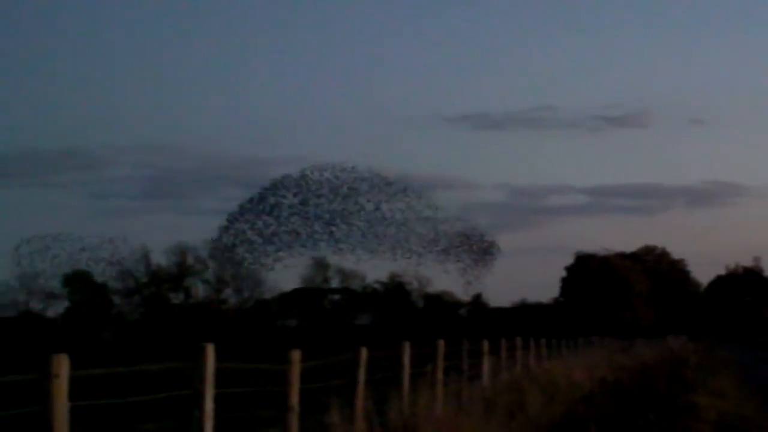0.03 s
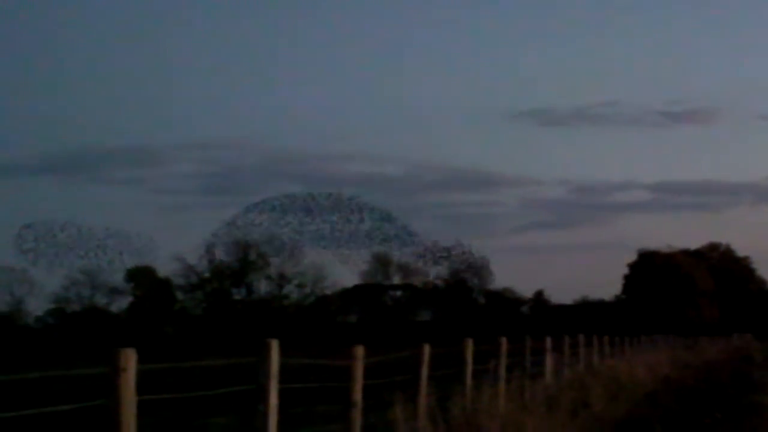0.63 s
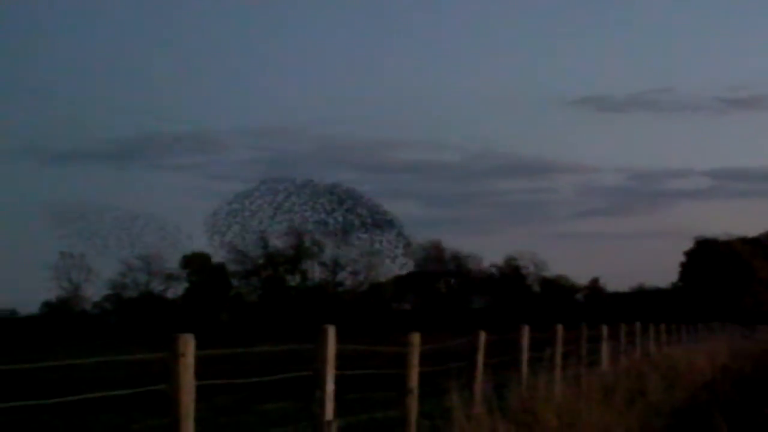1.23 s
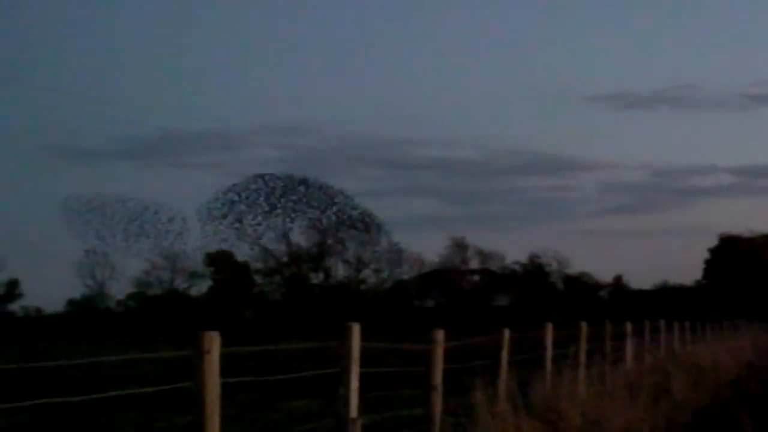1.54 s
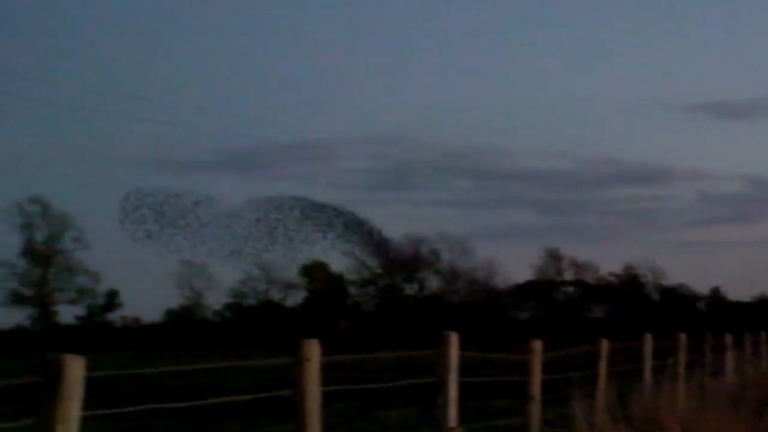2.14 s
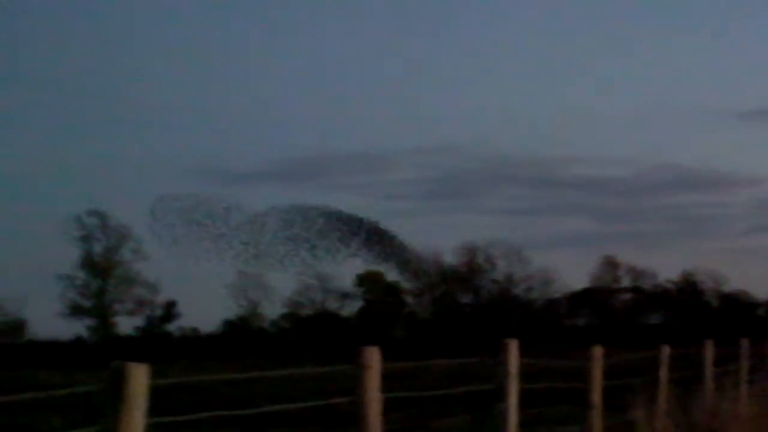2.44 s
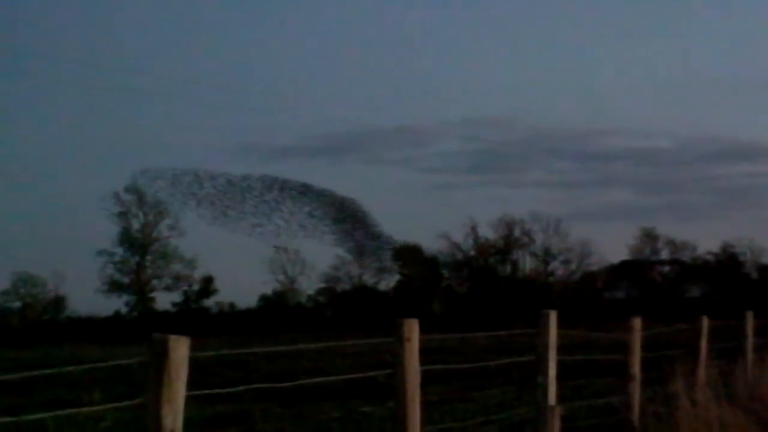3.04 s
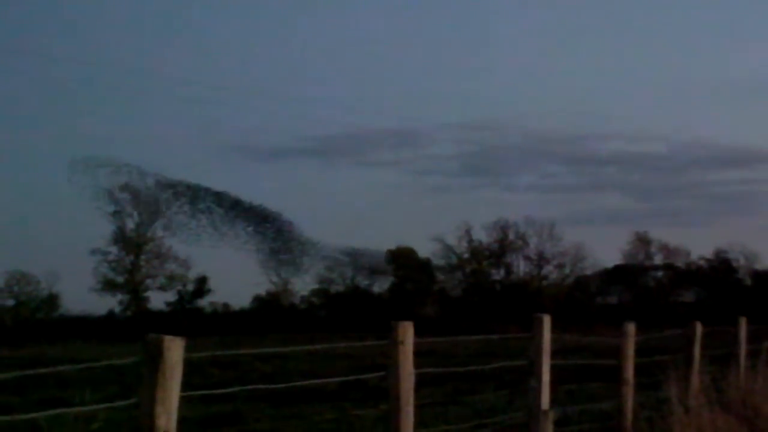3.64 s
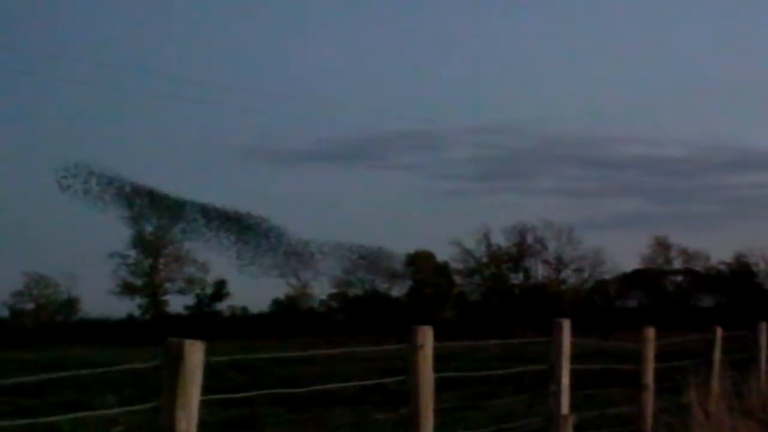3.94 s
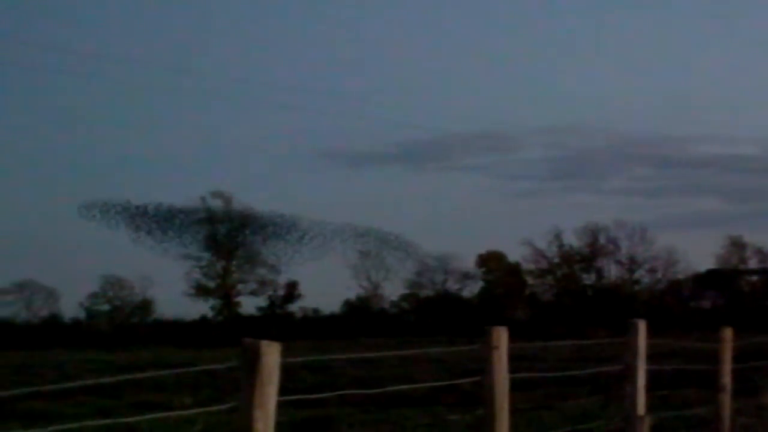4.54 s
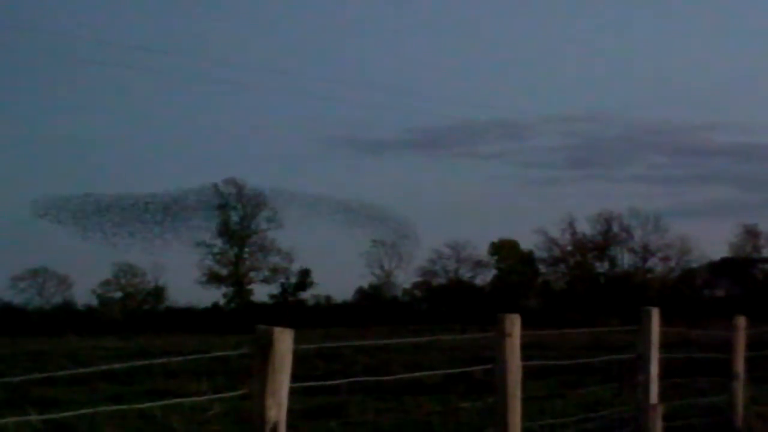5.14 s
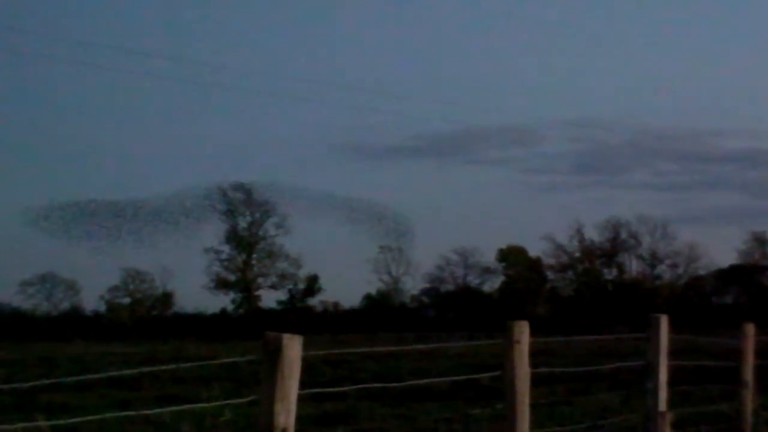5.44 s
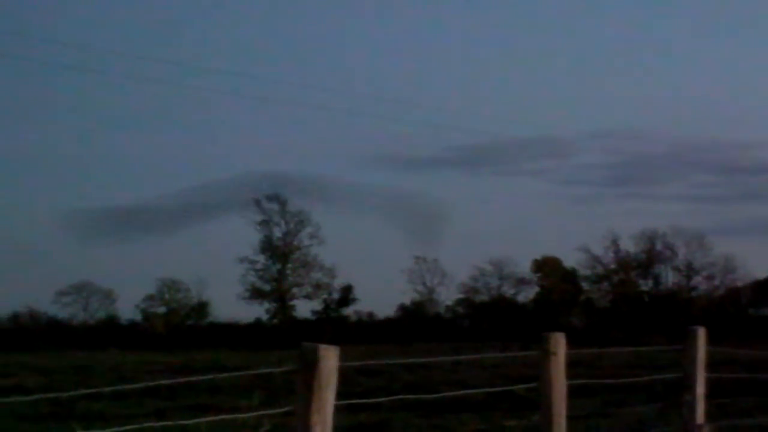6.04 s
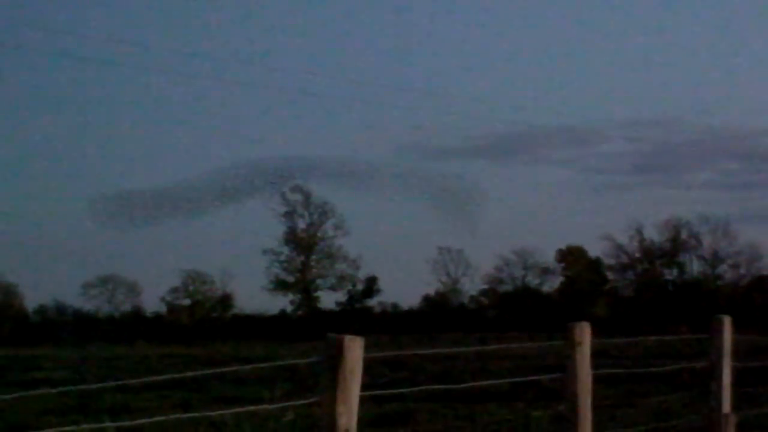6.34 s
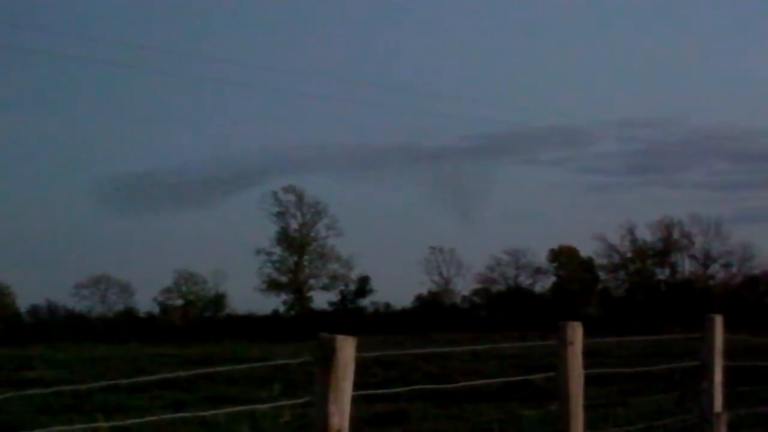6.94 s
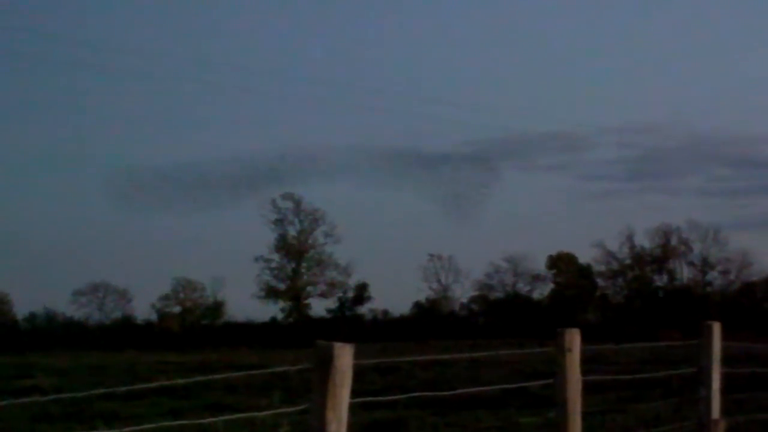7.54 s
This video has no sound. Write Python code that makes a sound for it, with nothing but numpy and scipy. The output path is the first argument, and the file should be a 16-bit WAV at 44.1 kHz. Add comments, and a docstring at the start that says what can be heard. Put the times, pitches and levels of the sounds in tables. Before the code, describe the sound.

A big flock of starlings chatters over an open field, the distant calls and wingbeats merging into a steady high hiss. Thin whistles, slurred screeches, short chips and harsh rasps poke out throughout. Midway, one bird close to the microphone gives a louder rapid rattle, a brief lower warble and a second, shorter rattle. The flock carries on unchanged over a faint low rumble.

```python
"""A field at dusk. A big starling flock chatters; countless far voices and wings merge into a hiss.
Slurred screeches, whistles, chips and harsh rasps stand out. One near bird gives two runs of a rapid
rattle with a short low warble between. Tonal calls are trembling near-sines from the syrinx; rasps,
wings, a faint rumble and one dull bump are shaped noise. Two microphones sit close together."""
import sys
import numpy as np
from scipy import signal
from scipy.fft import rfft, irfft, next_fast_len
from scipy.io import wavfile

SR = 44100
rng = np.random.default_rng(int(sys.argv[2]) if len(sys.argv) > 2 else 0)


def to_wav(sig):
    """Store sig (one row per channel, or 1-D mono) as 16-bit WAV at the path in sys.argv[1].

    Samples outside -1..1 are clipped; the rate is SR.
    """
    pcm = np.clip(np.atleast_2d(sig), -1, 1) * 32767
    pcm = np.round(pcm).astype(np.int16)
    wavfile.write(sys.argv[1], SR, pcm.T)  # frames by channels


N = 343539

# Flock swell. Each row: time in seconds, then relative chatter, hiss and sizzle levels in dB.
FLOCK_LEVELS = [(0.0, -47, -43, -54), (0.32, -46, -48.5, -58.5), (0.74, -45.5, -45.5, -53),
                (1.32, -45.5, -47, -56.5), (1.69, -45, -44.5, -55), (1.99, -45.5, -49, -58),
                (2.56, -46, -43.5, -52), (3.17, -45, -47.5, -57), (3.64, -45.5, -44.5, -54),
                (3.99, -44, -46, -54.5), (4.34, -44.5, -46.5, -56.5), (4.79, -42, -44.5, -52),
                (5.01, -45.5, -48, -56), (5.57, -45.5, -48, -55.5), (6.16, -45, -46.5, -56),
                (6.33, -44.5, -45, -53), (7.03, -44, -43.5, -51), (7.79, -47, -49, -57)]
# Background swell. Each row: time in seconds, rumble level in dB, wing level in dB.
BACKGROUND_LEVELS = [(0, -58, -50), (1.0, -59, -51), (1.4, -55, -50), (1.8, -60, -49.5), (2.8, -57, -49.5),
                     (3.7, -59.5, -50), (4.5, -59, -50.5), (6.5, -61, -51), (7.8, -63, -51.5)]
# Source spectra. Each row: frequency in Hz, relative spectral density in dB.
CHATTER_SPECTRUM = [(700, -29), (1200, -5.5), (1700, -3.5), (2700, 0), (3400, 0), (4100, -0.5),
                    (5000, -0.5), (7000, -49)]
HISS_SPECTRUM = [(3500, -21), (4600, -7), (5300, 2), (6000, -0.5), (6700, -0.5), (7500, 3), (8300, -4),
                 (8800, -5), (9300, -11.5), (11000, -53)]
SIZZLE_SPECTRUM = [(7500, -4), (9300, -0.5), (10200, 2), (11000, -6), (12000, 0), (13000, -7.5),
                   (14000, -5), (15200, -12.5), (16000, -20)]
RUMBLE_SPECTRUM = [(20, -20), (40, -9.5), (60, -1), (85, 1), (150, 0.5), (200, -7.5), (270, -14),
                   (400, -43)]
WING_SPECTRUM = [(200, -11.5), (280, -14), (320, -7.5), (380, -0.5), (430, 1), (500, -3), (800, -2),
                 (1200, -2), (1800, -4.5), (3500, -12.5)]
RASP_SPECTRUM = [(1200, -35), (2400, -4), (3200, 3), (4300, 1.5), (5600, 3), (6700, 0), (8300, -4),
                 (9400, -4.5), (10300, -7.5), (11100, -6), (12200, 1), (13500, -11.5), (15500, -25)]
BUMP_SPECTRUM = [(150, -10), (340, -4), (550, 0), (800, -9), (1300, -29)]
# Screeches. Each row: start in seconds, length in seconds, middle pitch in Hz, relative level in dB.
SCREECH_CALLS = [(-0.06, 0.28, 5590, -39.5), (0.572, 0.085, 6800, -35), (.62, 0.14, 5550, -38.5),
                 (0.82, .15, 5570, -40), (1.782, 0.12, 6250, -42), (2.071, 0.2, 7770, -40),
                 (2.382, 0.15, 5450, -41.5), (2.548, 0.16, 5900, -39.5), (2.659, .15, 5560, -41),
                 (3.368, 0.13, 6800, -34), (4.492, .13, 5780, -36.5), (5.013, .057, 5680, -40),
                 (5.296, 0.16, 5170, -43), (6.321, 0.19, 5470, -42)]
# Toneless calls. Each row: start in seconds, length in seconds, level in dB.
RASP_CALLS = [(0.096, 0.077, -45), (0.848, 0.066, -48), (2.38, 0.16, -44.5), (4.588, 0.064, -41.5),
              (5.196, 0.058, -40), (5.445, 0.072, -43.5), (5.691, 0.043, -42), (5.749, 0.066, -37.5),
              (6.71, 0.032, -44), (6.92, 0.044, -46), (7.07, .045, -43), (7.125, .03, -43),
              (7.164, 0.026, -39), (7.565, 0.06, -34)]
# Whistles. Each row: start and length in seconds, start pitch, end pitch and pitch scatter in Hz,
# relative level in dB.
WHISTLE_CALLS = [(0.107, .17, 8300, 8050, 45, -45), (0.147, 0.05, 1400, 1390, 60, -45.5),
                 (.42, 0.22, 8200, 7600, 160, -38.5), (0.717, .067, 8400, 8200, 90, -42),
                 (1.037, 0.15, 8400, 7450, 90, -41), (1.136, 0.039, 7280, 7350, 200, -31),
                 (1.293, 0.18, 7350, 7150, 169, -36.5), (1.602, .049, 8750, 8450, 110, -38),
                 (1.603, .12, 7800, 8400, 140, -36), (1.836, 0.086, 7600, 7950, 50, -40),
                 (2.196, 0.046, 7860, 8600, 120, -36), (2.264, .053, 7900, 7820, 40, -42),
                 (3.019, 0.099, 8900, 8400, 140, -45), (4.059, .032, 7820, 7500, 100, -31),
                 (4.353, 0.13, 8200, 7600, 180, -42), (4.815, .17, 7480, 7790, 150, -34),
                 (5.174, .047, 7630, 7500, 40, -38.5), (6.118, .41, 7270, 7360, 111, -39.5),
                 (6.579, 0.14, 6040, 7300, 35, -36), (6.745, 0.044, 7300, 7320, 150, -32),
                 (7.008, .166, 7400, 6870, 110, -37), (7.263, 0.066, 8450, 8280, 40, -41.5),
                 (7.46, .064, 6350, 7000, 35, -35)]
# Chips. Each row: start in seconds, length in seconds, middle pitch in Hz, relative level in dB.
CHIP_CALLS = [(0.234, .055, 2750, -44), (3.272, .025, 2900, -43), (4.341, 0.0235, 2600, -40),
              (4.444, 0.023, 2540, -38), (4.599, 0.018, 3050, -37), (6.782, 0.025, 3440, -44),
              (6.849, .044, 4615, -34), (7.567, 0.035, 4800, -37.5)]
# Rattle. Each row: time of the top note in seconds, pitch factor, pip, swoop and rasp levels in dB,
# pitch scatter in Hz.
RATTLE_SYLLABLES = [(3.356, 0.99, -44, -31.5, -37.5, 150), (3.455, 1.0, -37, -27.5, -36.5, 70),
                    (3.552, 1.0, -32, -28, -37, 70), (3.651, 0.99, -30.5, -28, -37, 70),
                    (3.749, 0.99, -32.5, -29, -37.5, 70), (3.850, 0.96, -33, -29.5, -37.5, 70),
                    (3.953, 0.93, -32, -32.5, -39, 100), (4.665, 0.97, -29.5, -32, -39, 324),
                    (4.774, 0.98, -32, -36.5, -39.5, 340), (4.867, 0.94, -39, -36.5, -38.5, 260),
                    (4.984, 0.76, -41, -39.5, -45, 260)]
# Pulses on the warble's held note. Each row: centre in seconds, level in dB.
HELD_NOTE_PULSES = [(4.056, -35), (4.075, -36), (4.091, -33), (4.131, -30), (4.154, -33), (4.166, -34),
                    (4.196, -33), (4.207, -33), (4.241, -33.5)]
# Dips below that note. Each row: centre in seconds, lowest pitch in Hz, relative level in dB.
HELD_NOTE_DIPS = [(4.073, 2480, -36.5), (4.109, 1890, -36), (4.149, 2370, -39), (4.187, 2370, -45),
                  (4.224, 2500, -44)]
# Microphone balance. Each row: frequency in Hz, left minus right in dB.
MIC_BALANCE_DB = [(60, 1.5), (200, 1.5), (330, 1.5), (1200, 1), (2700, 0), (4200, 2), (6400, 2), (9800, -3),
                  (15000, -1.5)]
# Left microphone phase. Each row: frequency in Hz, phase against the right in radians (negative lags).
LEFT_PHASE_RAD = [(0, -0.5), (2240, -1.0), (3360, -1.3), (4600, -2), (5700, -2.5), (6400, -2.5),
                  (8500, -4.5), (12600, -5), (15500, -5.5)]


def from_db(db):
    """Decibels to gain."""
    return 10 ** (np.asarray(db) / 20)


def unit_rms(x):
    """Scale to rms 1."""
    return x / np.sqrt(np.mean(x ** 2) + 1e-20)


def curves(rows):
    """Each level column, interpolated to every sample."""
    times_s, *columns = np.transpose(rows)
    return [np.interp(np.arange(N) / SR, times_s, column) for column in columns]


def at_hz(points, hz):
    """Read a spectrum on a log-frequency axis."""
    points_hz, values = np.transpose(points)
    return np.interp(np.log(hz + 1), np.log(points_hz), values)


def drift(rate_hz, size):
    """Random wander, spread 1, with rate_hz knots a second."""
    steps = np.arange(size) * rate_hz / SR
    knots = rng.standard_normal(int(steps[-1]) + 3)
    return np.interp(steps + rng.random(), np.arange(len(knots)), knots) * np.sqrt(3 / 2)


def noise(spectrum, apart=0.23):
    """Shaped stereo noise, rms 1; apart weights the part that differs between microphones."""
    size = next_fast_len(N)
    hz = np.fft.rfftfreq(size, 1 / SR)
    octaves_outside = np.abs(np.log2((hz + 1) / np.clip(hz, spectrum[0][0], spectrum[-1][0])))
    gain = from_db(at_hz(spectrum, hz) - 20 * octaves_outside)
    white = rng.standard_normal((3, size))
    pair = white[0] + apart * white[1:]
    return unit_rms(irfft(rfft(pair) * gain, size)[:, :N])


def add(out, start_s, sound):
    """Mix a sound in at start_s."""
    i = round(start_s * SR)
    lo, hi = max(i, 0), min(i + len(sound), N)
    if hi > lo:
        out[lo:hi] += sound[lo - i:hi - i]


def arch(length_s):
    """Swell and fade, height 1."""
    return np.sqrt(np.sin(np.linspace(0, np.pi, max(int(length_s * SR), 20))).clip(0))


def syrinx(hz, scatter_hz, flutter_db, overtone_db=-26, buzz=0., buzz_hz=1350):
    """Near-sine trembling in pitch and level; fast membrane buzz adds sidebands."""
    size = len(hz)
    phase = 2 * np.pi * np.cumsum(hz + scatter_hz * drift(1100, size)) / SR
    flutter = unit_rms(from_db(flutter_db * drift(260, size)))
    buzz_phase = 2 * np.pi * np.cumsum(buzz_hz * (1 + 0.113 * drift(330, size))) / SR
    throb = 1 + buzz * np.sin(buzz_phase)
    overtones = sum((k * hz < SR / 2) * np.sin(k * phase) / (k - 1) for k in (2, 3))
    return np.sqrt(2) * flutter * throb * (np.sin(phase) + from_db(overtone_db) * overtones)


def slur(length_s, start_hz, middle_hz, end_hz, scatter_hz):
    """One call bending through three pitches."""
    swell = arch(length_s)
    bend = np.polyfit([0, .5, 1], [start_hz, middle_hz, end_hz], 2)
    hz = np.polyval(bend, np.linspace(0, 1, len(swell)))
    return swell * syrinx(hz, scatter_hz, flutter_db=3)


def crowd(spectrum, low_hz, high_hz, length_s, scatter_hz, spread_db, count):
    """Far birds calling at random, mostly in falling slurs; rms 1."""
    out = np.zeros(N)
    for when, pitch, span, fall, harsh, distance in rng.random((count, 6)):
        hz = low_hz + pitch * (high_hz - low_hz)
        slide = 0.1012 * (fall - .3)
        start_hz, end_hz = hz * (1 + slide), hz * (1 - slide / 2)
        call = slur(length_s * (.4 + span), start_hz, hz, end_hz, scatter_hz * (0.2 + harsh))
        gain = from_db(at_hz(spectrum, hz) - spread_db * np.sqrt(distance))
        add(out, when * N / SR - length_s / 2, gain * call)
    return unit_rms(out)


def far_flock():
    """Low chatter, high squeals, a few pure whistles; the farthest voices blur into hiss."""
    chirps = crowd(CHATTER_SPECTRUM, 1397.3, 4400, length_s=.025, scatter_hz=153, spread_db=6.5, count=700)
    squeals = crowd(HISS_SPECTRUM, 4700, 9000, length_s=.06, scatter_hz=120, spread_db=5.5, count=620)
    pure = crowd(HISS_SPECTRUM, 7000, 8900, length_s=.07, scatter_hz=35, spread_db=6, count=24)
    squeaks = crowd(SIZZLE_SPECTRUM, 9300, 14000, length_s=.03, scatter_hz=220, spread_db=18, count=700)
    chatter = from_db(0.7) * noise(CHATTER_SPECTRUM, apart=0.55) + from_db(-5.5) * chirps
    hiss = from_db(3.5) * noise(HISS_SPECTRUM, apart=0.99) + from_db(1.8) * squeals + from_db(-3) * pure
    sizzle = from_db(2) * noise(SIZZLE_SPECTRUM, apart=0.76) + from_db(-4.5) * squeaks
    flicker = from_db(1.05 * drift(45, N) + 0.77 * drift(9, N))
    chatter_gain, hiss_gain, sizzle_gain = from_db(curves(FLOCK_LEVELS))
    return chatter_gain * chatter + flicker * (hiss_gain * hiss + sizzle_gain * sizzle)


def rumble_and_wings():
    """Distant rumble and the rush of wings, both wavering slightly."""
    rumble_db, wings_db = curves(BACKGROUND_LEVELS)
    rumble = from_db(rumble_db + 1.1 * drift(9, N)) * noise(RUMBLE_SPECTRUM, apart=0.5)
    wings = from_db(wings_db + .5 * drift(18, N)) * noise(WING_SPECTRUM, apart=0.28)
    return rumble + wings


def screeches(fall_hz_per_s=9500, sag_hz=197.8, scatter_hz=209):
    """Harsh calls that slide down and flatten out."""
    out = np.zeros(N)
    for start_s, length_s, hz, db in SCREECH_CALLS:
        half_fall_hz = fall_hz_per_s * length_s / 2
        call = slur(length_s, hz + sag_hz + half_fall_hz, hz, hz + sag_hz - half_fall_hz, scatter_hz)
        add(out, start_s, from_db(db) * call)
    return out


def rasps(lead_s=0.026, syllable_s=0.075, grain_db=2.5):
    """Harsh grainy noise, alone and in every rattle syllable."""
    envelope = np.zeros(N)
    for start_s, length_s, db in RASP_CALLS:
        add(envelope, start_s, from_db(db) * arch(length_s))
    for top_s, _, _, _, rasp_db, _ in RATTLE_SYLLABLES:
        add(envelope, top_s - lead_s, from_db(rasp_db) * arch(syllable_s))
    grain = unit_rms(from_db(grain_db * drift(600, N)))
    return envelope * grain * noise(RASP_SPECTRUM, apart=0.99)


def whistles(rise_share=.018):
    """Thin calls, each a shallow arch between two pitches."""
    out = np.zeros(N)
    for start_s, length_s, start_hz, end_hz, scatter_hz, db in WHISTLE_CALLS:
        middle_hz = (1 + rise_share) * (start_hz + end_hz) / 2
        add(out, start_s, from_db(db) * slur(length_s, start_hz, middle_hz, end_hz, scatter_hz))
    return out


def chips(fall_share_per_s=5.9, scatter_share=0.036):
    """Short rough calls that drop in pitch."""
    out = np.zeros(N)
    for start_s, length_s, hz, db in CHIP_CALLS:
        half_fall_hz = fall_share_per_s * hz * length_s / 2
        call = slur(length_s, hz + half_fall_hz, hz, hz - half_fall_hz, scatter_share * hz)
        add(out, start_s, from_db(db) * call)
    return out


def pip(length_s, hz, droop_share=0.042):
    """Short soft-edged note, slightly flat at both ends."""
    swell = arch(length_s)
    bend = 1 - droop_share * np.linspace(-1, 1, len(swell)) ** 2
    return swell ** 2 * syrinx(hz * bend, scatter_hz=70, flutter_db=2.5)


def swoop(pitch_factor, scatter_hz, attack_s, length_s=.036, release_s=.012):
    """Tone that wavers as it sinks; the other side of the syrinx adds an undertone."""
    base_hz, sink_hz, waver_hz, waver_fade_s = 5160, 2205, 948, 0.037
    knee_hz, db_per_octave = 4360, 25   # the voice fades below the knee
    t = np.arange(-attack_s, length_s, 1 / SR)
    effort = np.minimum(1 + t / attack_s, (length_s - t) / release_s).clip(0, 1)
    period_s = .0205 * (1 + 0.063 * rng.uniform(-0.75, 1))
    waver = np.exp(-t / waver_fade_s) * np.cos(2 * np.pi * t / period_s)
    contour_hz = base_hz + waver_hz * waver - sink_hz * (t / length_s) ** 3
    throat_db = db_per_octave * np.log2(np.minimum(contour_hz / knee_hz, 1))
    hz = pitch_factor * contour_hz
    tone = syrinx(hz, scatter_hz, flutter_db=1.8, overtone_db=-16, buzz=0.4 * effort)
    undertone = syrinx(.69 * hz, scatter_hz, flutter_db=3)
    return from_db(throat_db) * effort * (tone + from_db(-18.5) * undertone)


def rattle(pip_lead_s=0.0216, attack_s=.005):
    """Near bird repeating a pip and a swoop ten times a second, never quite alike."""
    out = np.zeros(N)
    for top_s, pitch_factor, pip_db, swoop_db, _, scatter_hz in RATTLE_SYLLABLES:
        add(out, top_s - pip_lead_s, from_db(pip_db) * pip(length_s=0.02, hz=4420))
        add(out, top_s - attack_s, from_db(swoop_db) * swoop(pitch_factor, scatter_hz, attack_s))
    return out


def warble(start_s=4.041, opening_s=.014, held_s=0.202, held_hz=3117, pulse_s=.015, dip_s=.038):
    """After a higher pip, one side of the syrinx pulses on a held note; the other dips harshly below."""
    out = np.zeros(N)
    add(out, start_s, from_db(-30.5) * pip(opening_s, hz=3790))
    held = slur(held_s, held_hz, held_hz, held_hz, scatter_hz=90)
    add(out, start_s + opening_s, from_db(-40) * held)
    for centre_s, db in HELD_NOTE_PULSES:
        add(out, centre_s - pulse_s / 2, from_db(db) * pip(pulse_s, held_hz))
    for centre_s, lowest_hz, db in HELD_NOTE_DIPS:
        dip = slur(dip_s, held_hz, lowest_hz, held_hz, scatter_hz=186)
        swell = np.linspace(.5, 1, len(dip))
        add(out, centre_s - dip_s / 2, from_db(db) * swell * dip)
    return out


def bump(start_s=6.04, length_s=0.1, level_db=-48):
    """One soft dull burst of noise."""
    envelope = np.zeros(N)
    add(envelope, start_s, from_db(level_db) * arch(length_s))
    return envelope * noise(BUMP_SPECTRUM)


def outdoors(x, tail_db, t60_s=0.15):
    """Ground, fence and trees scatter a short faint tail to each microphone."""
    t = np.arange(SR // 4) / SR
    tail = rng.standard_normal((2, len(t))) * from_db(-60 * t / t60_s) * (t > .003)
    tail /= np.sqrt(np.sum(tail ** 2, axis=1, keepdims=True))
    return x + from_db(tail_db) * signal.fftconvolve(x[None], tail, axes=1)[:, :N]


def scene():
    """All birds over the quiet field; the near bird is drier than the single calls."""
    single_calls = outdoors(from_db(-1.55) * (screeches() + whistles() + chips()), tail_db=-6.5)
    near_bird = outdoors(rattle() + warble(), tail_db=-15)
    return single_calls + near_bird + rasps() + far_flock() + rumble_and_wings() + bump()


def record(dry, cutoff_hz=15750):
    """Microphone pair: the left lags slightly, the two differ in colour, the top is cut."""
    size = next_fast_len(N + SR // 10)
    hz = np.fft.rfftfreq(size, 1 / SR)
    half_balance_db = at_hz(MIC_BALANCE_DB, hz) / 2
    phase_rad = np.interp(hz, *np.transpose(LEFT_PHASE_RAD))
    pair = np.array([from_db(half_balance_db) * np.exp(1j * phase_rad), from_db(-half_balance_db)])
    heard = irfft(rfft(dry, size) * pair, size)[:, :N]
    lowpass = signal.ellip(12, .1, 80, cutoff_hz, fs=SR, output="sos")
    return signal.sosfilt(lowpass, heard)


dry = scene()
out = record(dry)
to_wav(out)
```